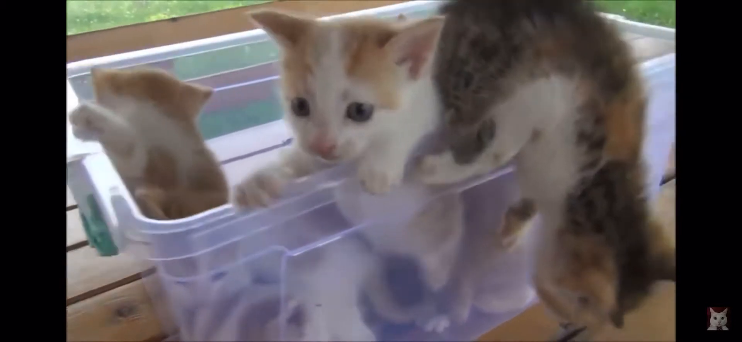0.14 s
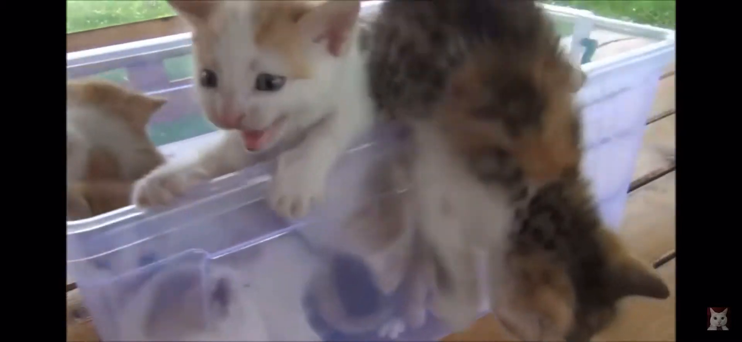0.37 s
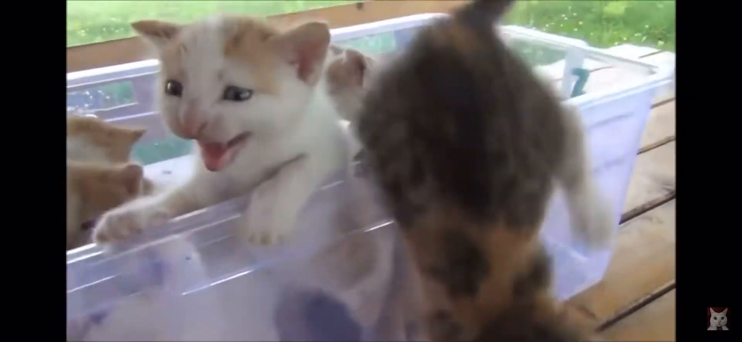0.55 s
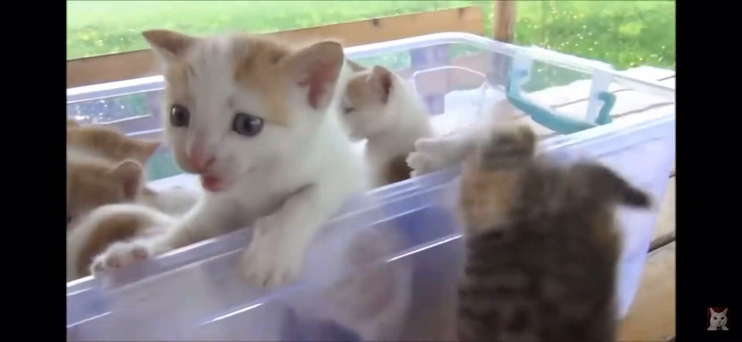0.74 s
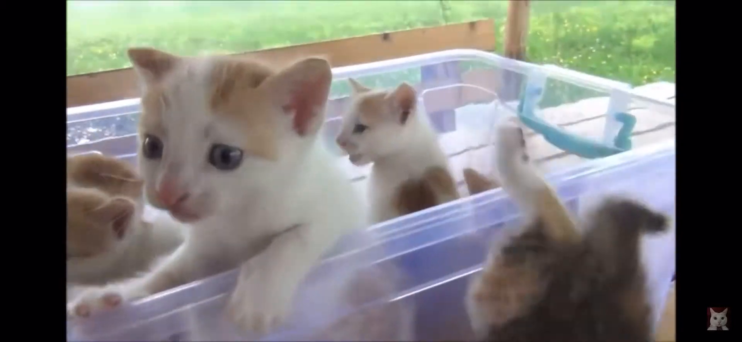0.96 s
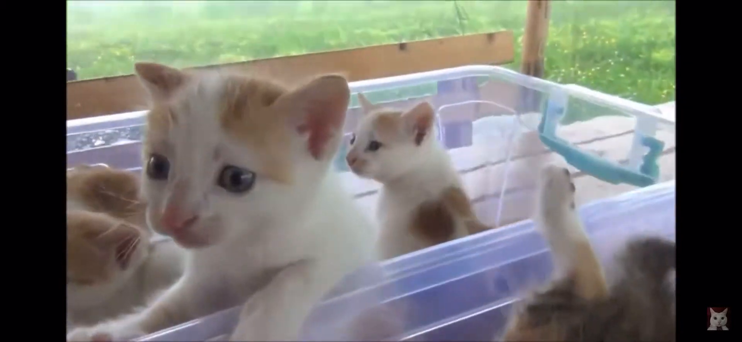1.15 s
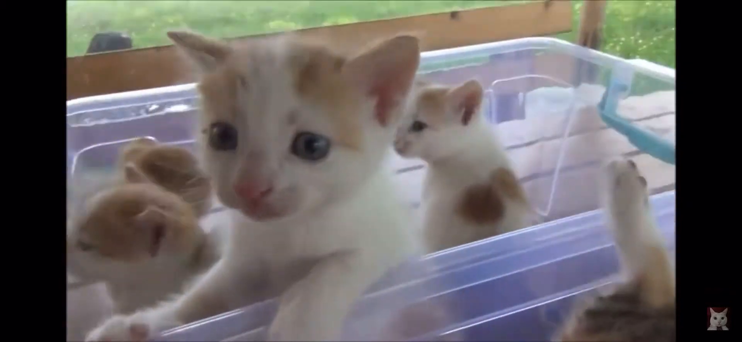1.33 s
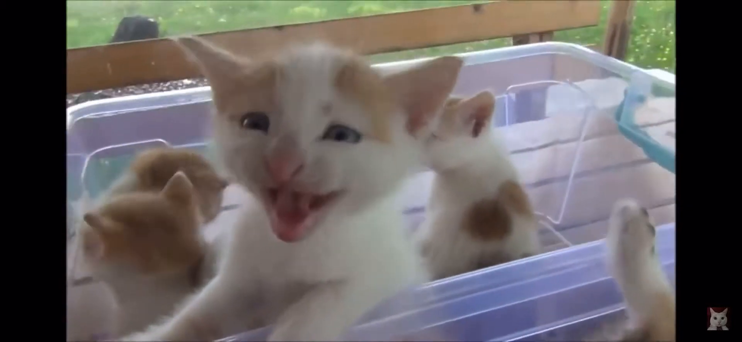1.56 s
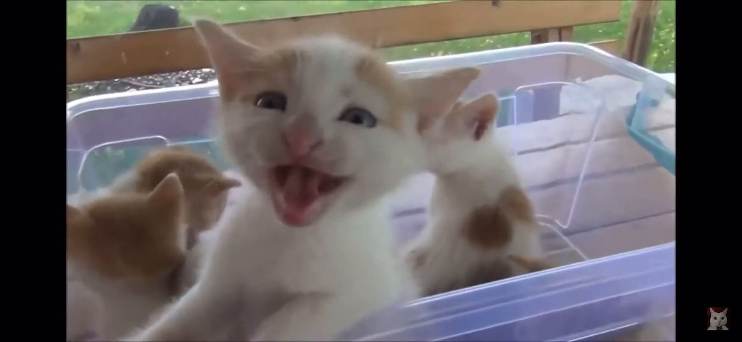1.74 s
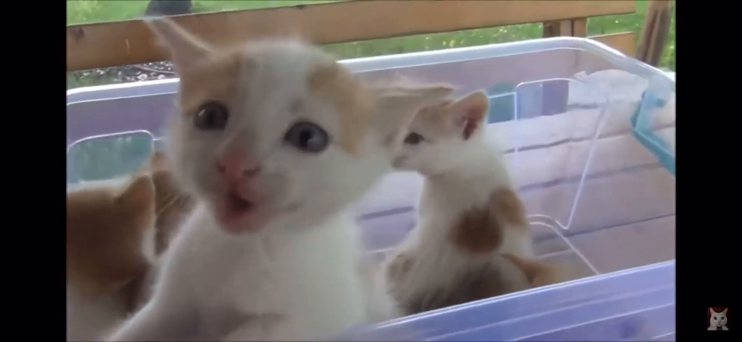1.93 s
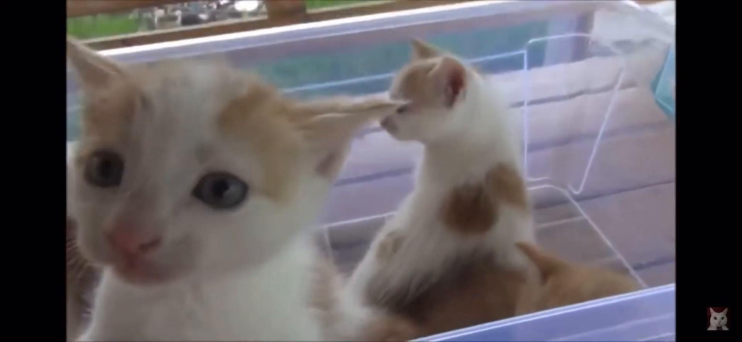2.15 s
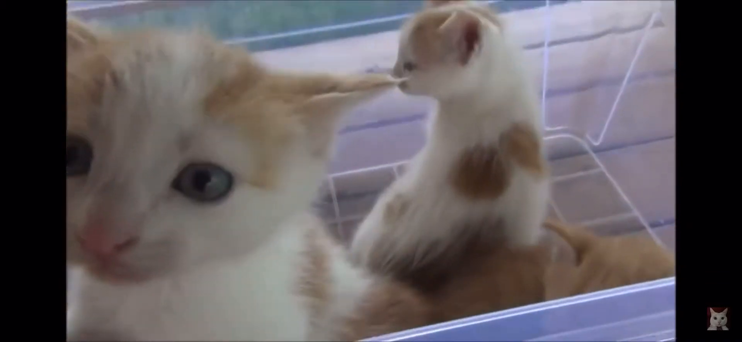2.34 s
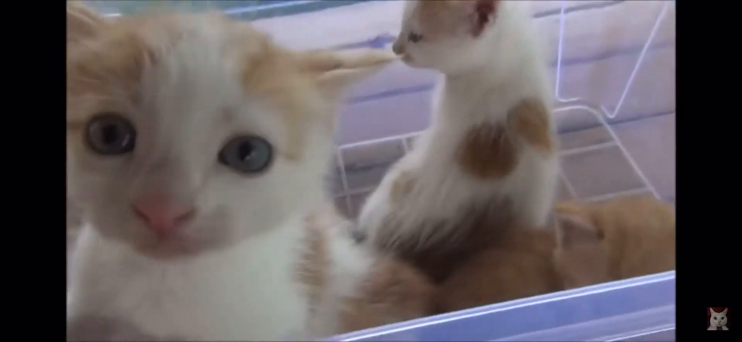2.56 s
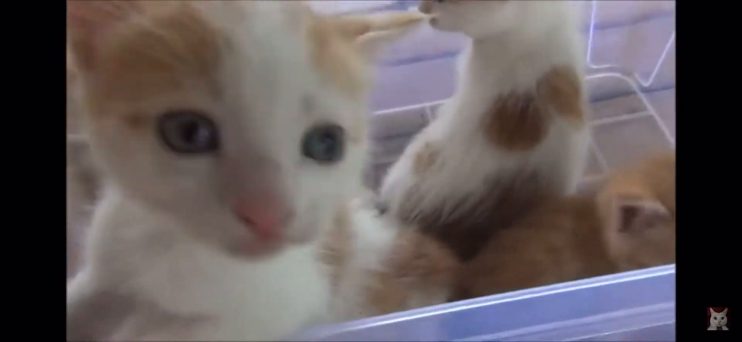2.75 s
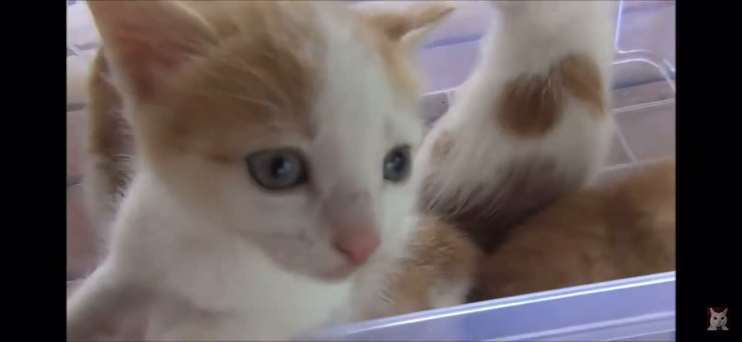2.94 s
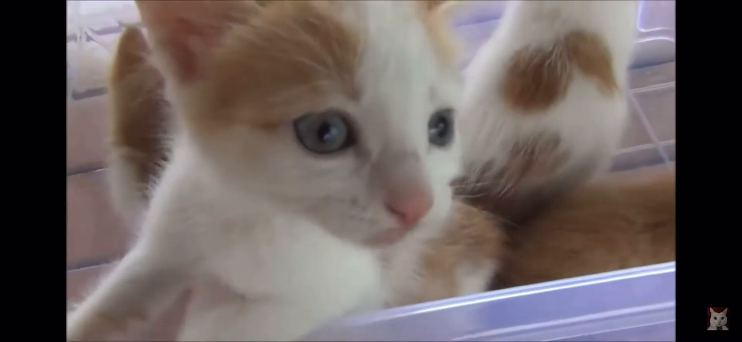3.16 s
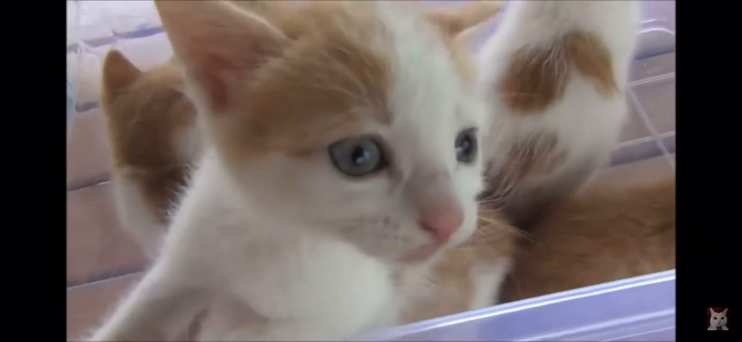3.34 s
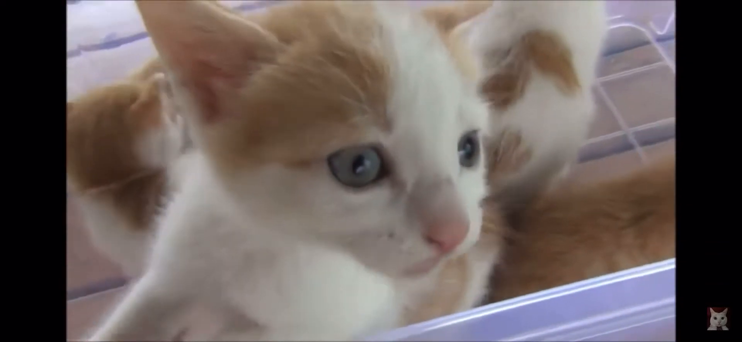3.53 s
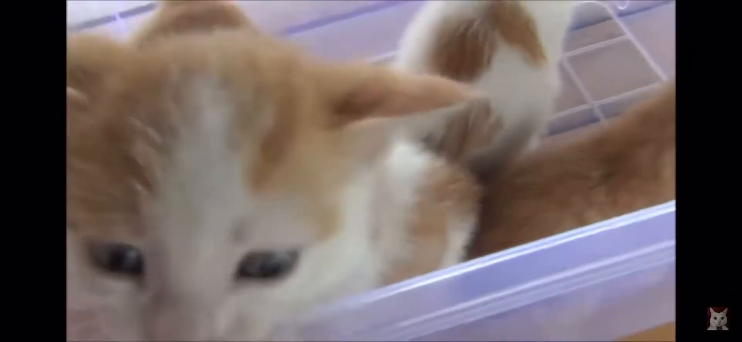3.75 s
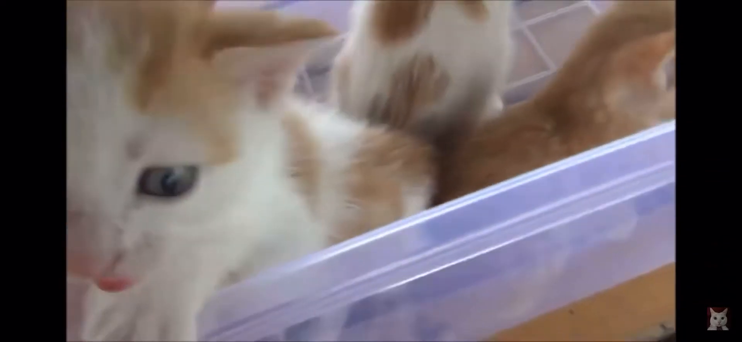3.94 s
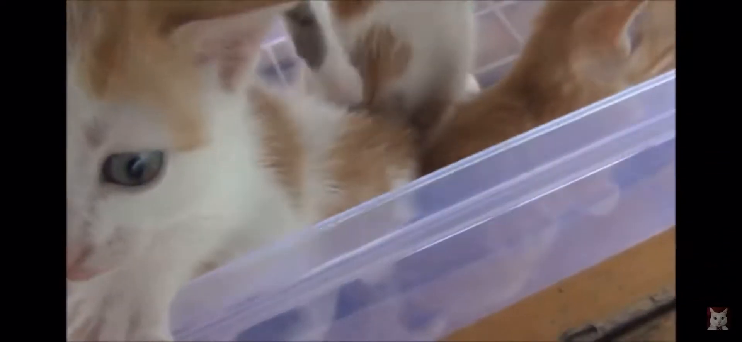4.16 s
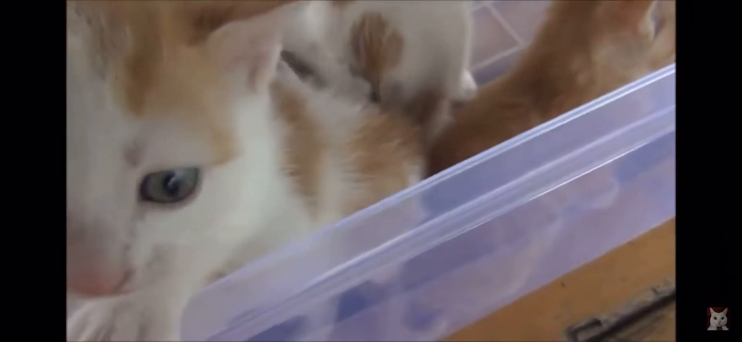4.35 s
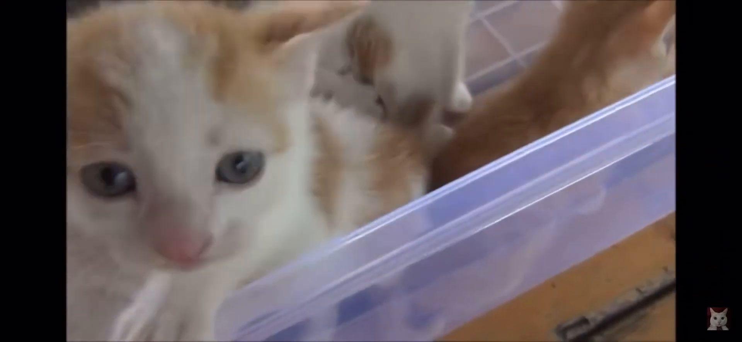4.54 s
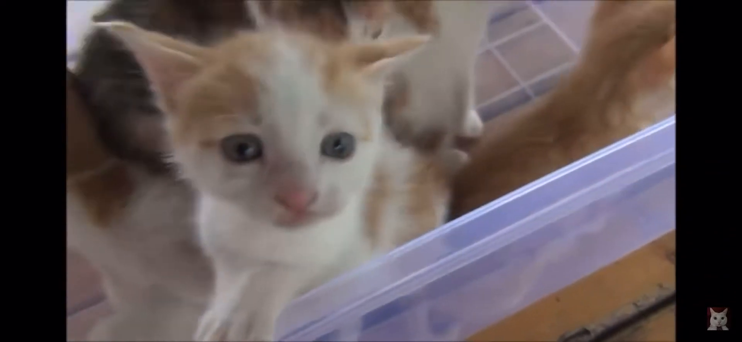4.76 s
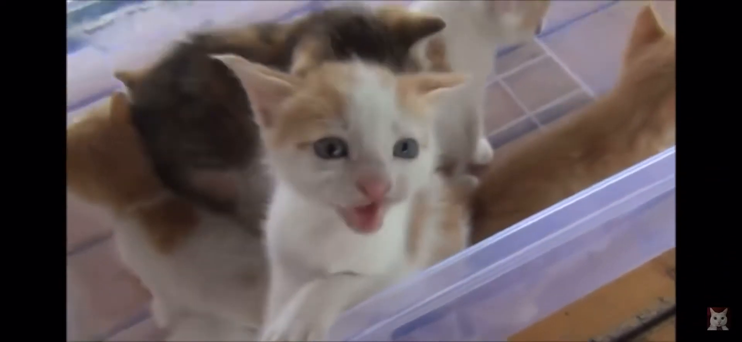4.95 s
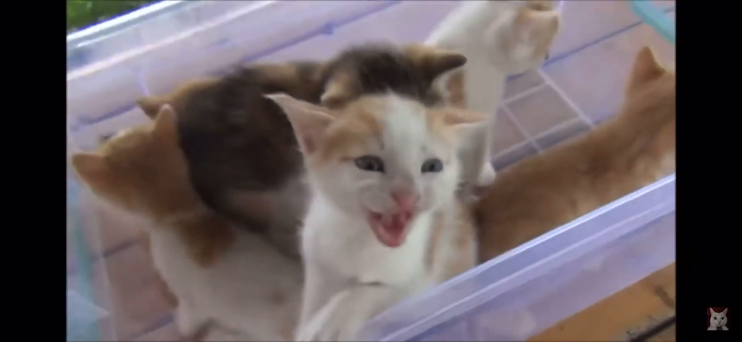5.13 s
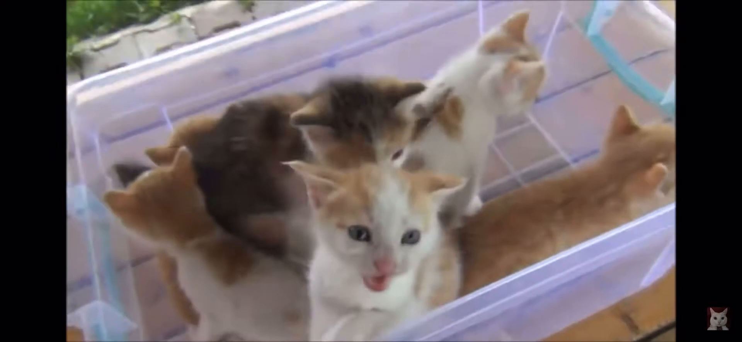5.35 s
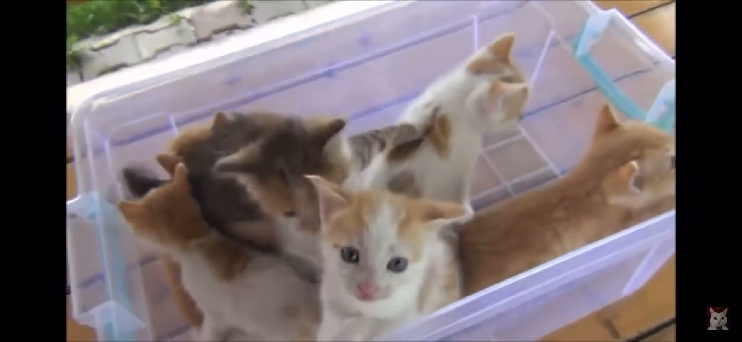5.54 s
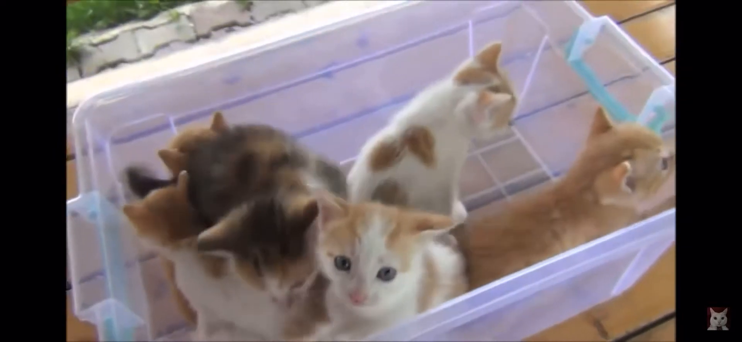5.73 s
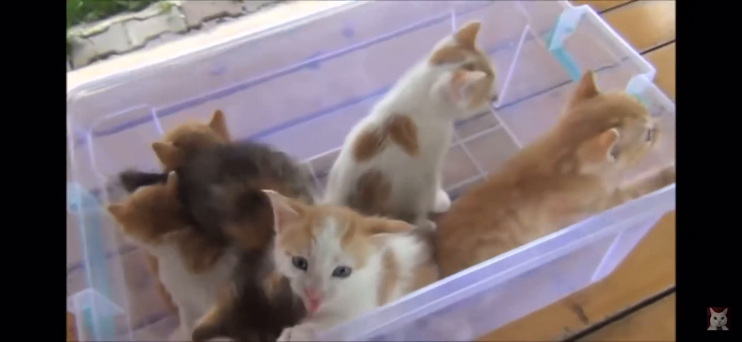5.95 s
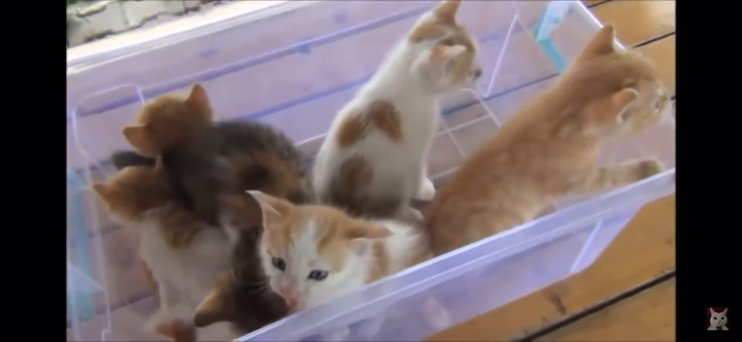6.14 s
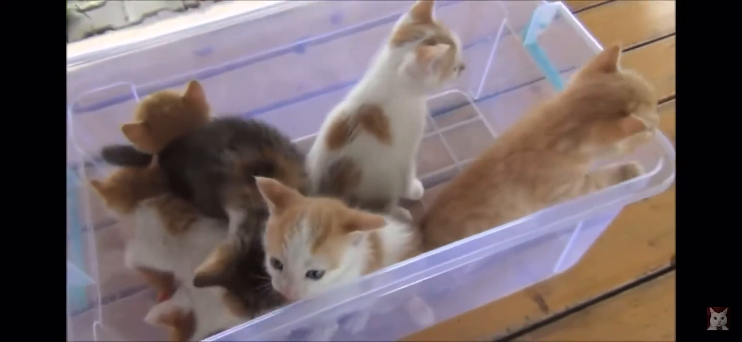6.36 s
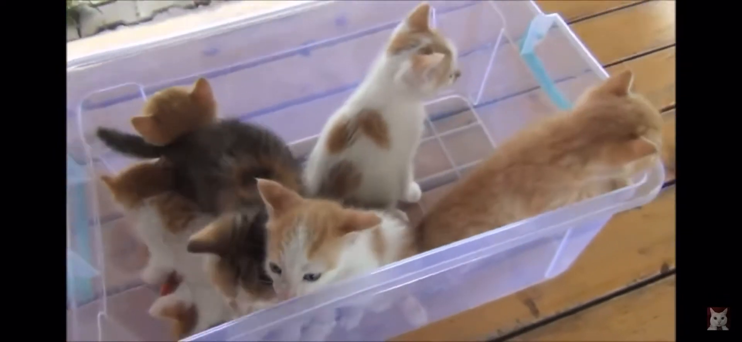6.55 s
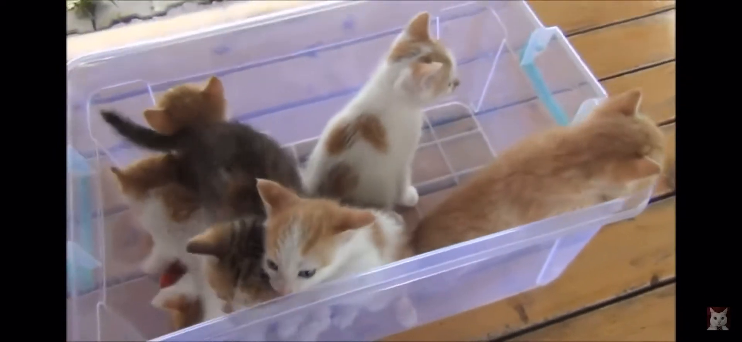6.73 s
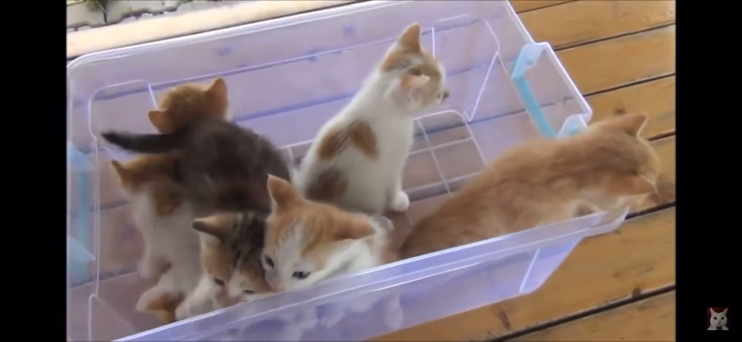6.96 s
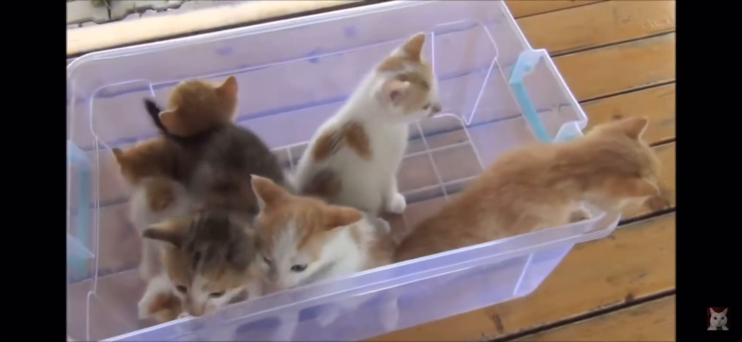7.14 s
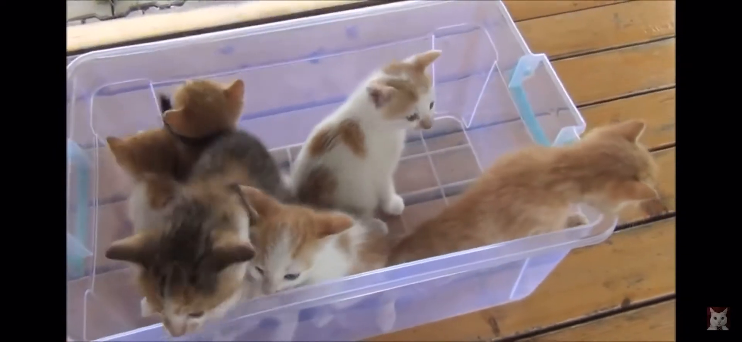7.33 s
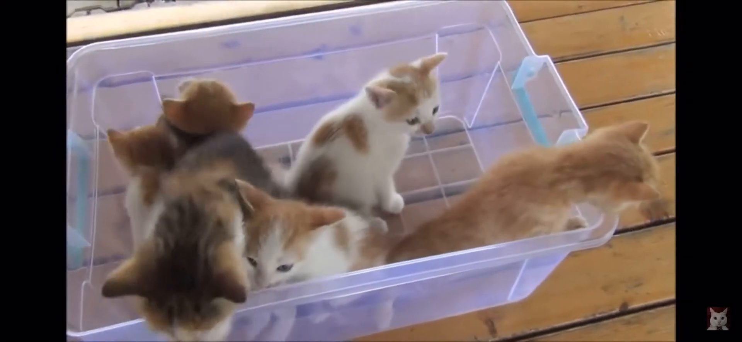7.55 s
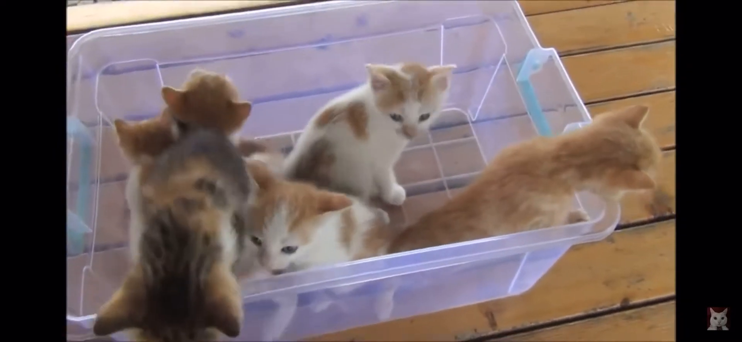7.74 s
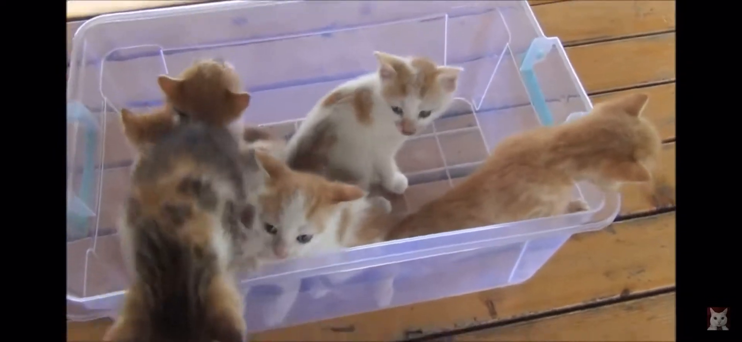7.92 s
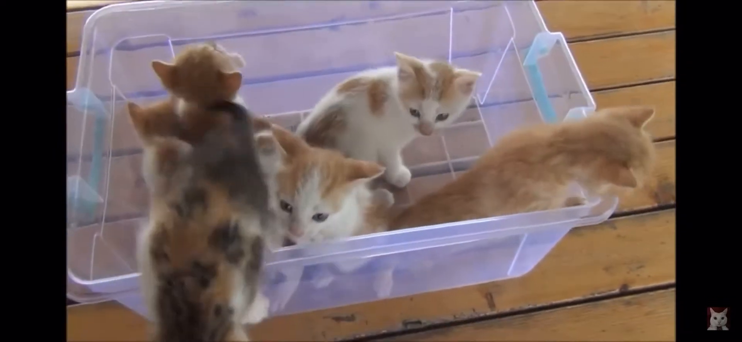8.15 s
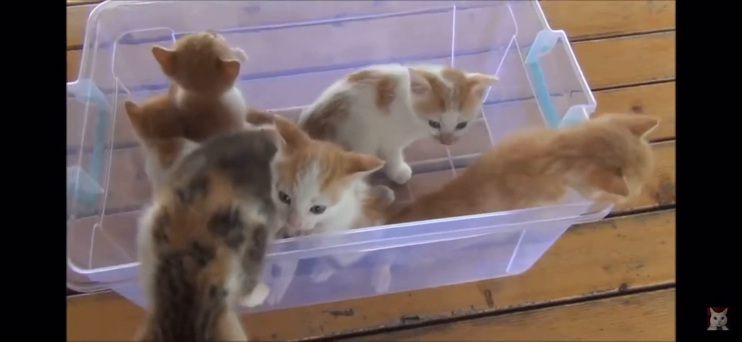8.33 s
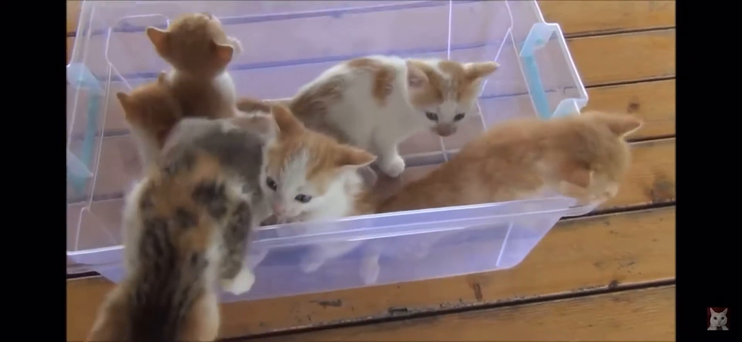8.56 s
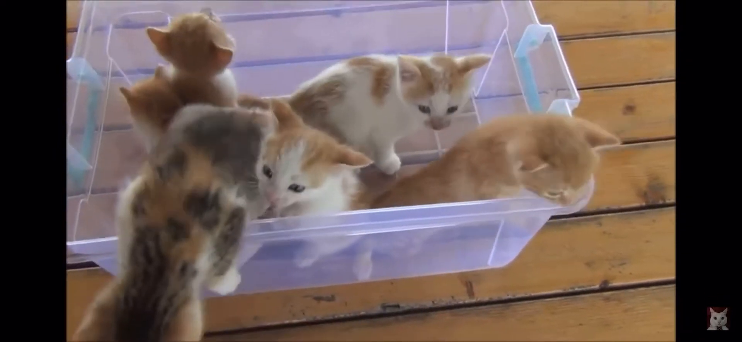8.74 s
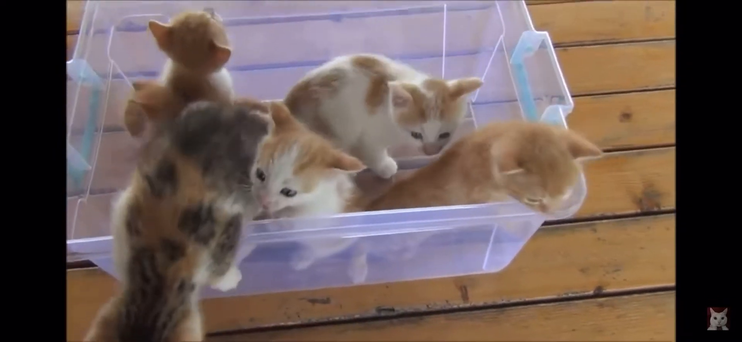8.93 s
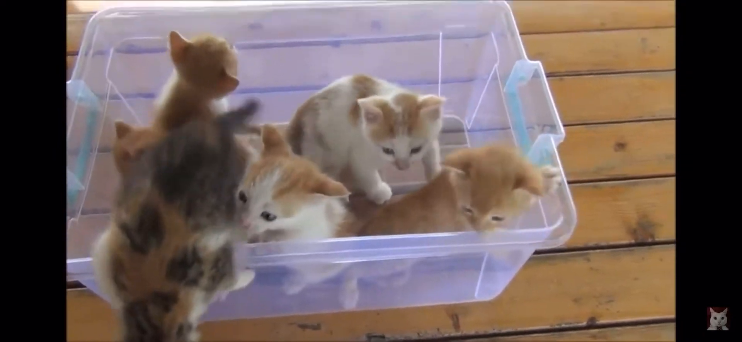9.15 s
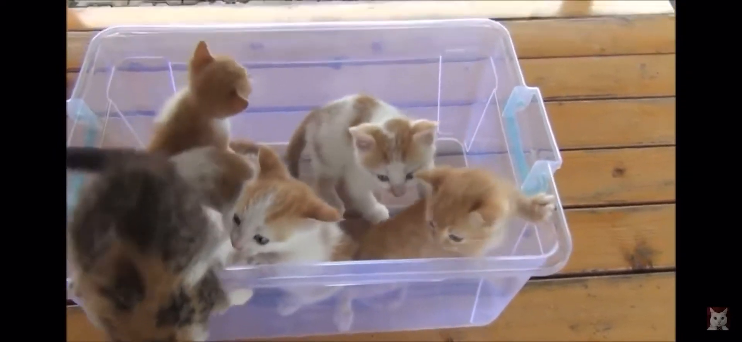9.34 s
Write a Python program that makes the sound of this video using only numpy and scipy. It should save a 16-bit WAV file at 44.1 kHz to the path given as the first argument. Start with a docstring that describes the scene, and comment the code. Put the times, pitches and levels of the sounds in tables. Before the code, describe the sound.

A near kitten gives bright, falling mews among thinner squeaks and muffled calls, while small paws bump and scratch a hollow plastic tub outdoors.

```python
"""Kittens crowd a plastic tub on a wooden porch and mew over one another, one voice nearest.
Each mew is a sum of harmonics filtered by mouth and head resonances, with leaking air roughening them.
Paws thump the tub, claws tick, scrape and rustle: noise bursts exciting damped resonances of tub and boards.
Shuffling bodies, outdoor air, a faint hum and a far bird's gliding whistles lie under it all."""
import sys
import numpy as np
from scipy import signal
from scipy.io import wavfile
from scipy.ndimage import uniform_filter1d

SR = 44100
rng = np.random.default_rng(int(sys.argv[2]) if len(sys.argv) > 2 else 0)


def level_to_linear(level):
    """Convert decibel levels to linear amplitude factors, elementwise."""
    exponent = np.asarray(level, float) / 20
    return 10 ** exponent


def dump_mix(stems):
    """Bounce the given channels to the path in sys.argv[1] as a 16-bit WAV at rate SR."""
    frames = np.atleast_2d(stems).T  # one column per channel
    limited = np.clip(frames, -1, 1)  # hard clip at full scale
    pcm = np.round(limited * 32767).astype(np.int16)
    wavfile.write(sys.argv[1], SR, pcm)


N = 414098  # length in samples

# the nearest kitten, one list a mew: start_s, pitch_hz, effort_db (relative), opening (mouth, 0-1)
NEAR_MEWS = [
    [(.292, 595, -51.5, 0.7), (.37, 943.6, -43, 0.67), (.42, 1004, -36.5, 0.67), (.465, 1002, -39, 0.6),
     (.5, 947, -34, .525), (.522, 943, -32, .52), (.536, 966, -39.5, .53), (.58, 921, -34.5, 0.45),
     (.63, 871, -40.5, 0.34), (.72, 743, -43, 0.26), (.812, 429, -52.5, 0.18)],
    [(1.428, 632, -54.5, 0.56), (1.48, 951, -43.5, 0.85), (1.54, 1041, -37, 0.68),
     (1.608, 988, -35.5, 0.58), (1.62, 1019, -38, 0.61), (1.72, 932, -38, 0.34), (1.82, 852, -39, 0.23),
     (1.95, 677, -43.5, 0.15), (1.998, 523, -44.5, 0.1)],
    [(3.575, 630, -52.5, 0.59), (3.63, 896, -42.5, 0.64), (3.695, 1021, -33, 0.64),
     (3.713, 994, -34.5, .57), (3.742, 991, -33.5, .56), (3.758, 999, -34, .51), (3.81, 975, -32.5, 0.41),
     (3.925, 892, -35.5, 0.24), (4.0, 835.7, -36.5, 0.23), (4.14, 614.5, -43.5, 0.14),
     (4.182, 470, -41.5, 0.04)],
    [(4.965, 607, -59, 0.61), (5.03, 909, -46, 0.73), (5.1, 1021, -39, 0.65), (5.137, 1012, -37, .6),
     (5.168, 967, -35, .545), (5.192, 989, -39, .49), (5.3, 890.5, -41.5, 0.36), (5.4, 768, -43, 0.23),
     (5.538, 456.6, -53.5, 0.08)],
    [(5.858, 548, -62, 0.6), (5.91, 908, -44.5, 0.63), (5.97, 1008, -40, 0.66), (6.08, 969, -39, 0.53),
     (6.2, 886.5, -40, 0.38), (6.3, 812, -47, 0.26), (6.4, 658, -47.5, 0.19), (6.512, 447, -68.5, 0.22)],
    [(8.56, 577.4, -57, 0.54), (8.61, 835, -53, 0.75), (8.66, 922, -42.5, 0.61), (8.72, 951, -42.5, 0.6),
     (8.78, 900.4, -38.5, 0.5), (8.86, 877, -38.5, 0.4), (8.92, 797, -43, 0.29), (9.03, 669, -46, 0.21),
     (9.158, 446.6, -55.5, 0.07)],
]
# side of each near mew: left_minus_right_db
NEAR_SIDES = [1.33, 0.63, 3, 0.37, 0.34, 1.1]


def read(points, hz):
    """Interpolates a spectrum linearly in dB along a log-frequency axis."""
    f, value = np.transpose(points)
    return np.interp(np.log(hz + 1), np.log(f + 1), value)


def evened(x):
    """Normalizes the mean power: scales to rms 1."""
    return x / np.sqrt(np.mean(x ** 2) + 1e-20)


def add(mix, s, sound, pan_db=0):
    """Superposes a sound at a time in seconds, placed by its left-minus-right level difference."""
    part = mix[:, round(s * SR):][:, :len(sound)]
    part += sound[:part.shape[1]] * level_to_linear(np.array([[pan_db / 2], [-pan_db / 2]]))


def drift(length, size):
    """Low-pass random fluctuation of rms 1: white noise averaged twice over size samples."""
    return evened(uniform_filter1d(uniform_filter1d(rng.standard_normal(length), size), size))


def resonate(x, hz, width_hz):
    """Resonance of gain 1 by heterodyning: shifts hz to zero, smooths with one pole, shifts back."""
    turn = np.exp(2j * np.pi * np.cumsum(hz * np.ones(len(x))) / SR)
    r = np.exp(-np.pi * width_hz / SR)
    return 2 * (turn * signal.lfilter([1 - r], [1, -r], x / turn)).real


def resonate_twice(x, hz, width_hz):
    """Two equal resonances in cascade, which steepen the skirts."""
    return resonate(resonate(x, hz, width_hz), hz, width_hz)


def rounded(t, s, v):
    """Monotone cubic curve through the points, smooth and without overshoot."""
    step = np.diff(v) / np.diff(s)
    a, b = np.r_[step[0], step], np.r_[step, step[-1]]
    slope = np.where(a * b > 0, 2 * a * b / (a + b + 1e-20), 0)  # harmonic mean of both sides
    i = np.clip(np.searchsorted(s, t) - 1, 0, len(step) - 1)
    h = np.diff(s)[i]
    u = (t - s[i]) / h
    bend = (1 - u) * (slope[i] - step[i]) - u * (slope[i + 1] - step[i])
    return v[i] + h * u * (step[i] + (1 - u) * bend)


def mew(rows, head, sharp=0.82, tilt_db=0, dark_db=-18, jitter=.0025, shimmer_db=1.5, breath_db=-29.0,
        top_db=0, rasp_db=6.0, rise_s=0.005):
    """Source and filter: fold harmonics under a mouth resonance that follows the opening, roughened by air."""
    # gain round the mouth resonance: ratio (to the resonance), shape_db (before the factor sharp)
    mouth_shape = [(.2, 5.5), (.35, -2.1), (.5, 10), (.7, 10), (.86, 19.5), (.97, 30.5), (1.03, 27.5),
                   (1.15, 19.5), (1.35, 9.5), (1.6, 5.5), (2.1, 2), (5, 1.7)]
    shut_hz, open_hz, head_from_hz, top_hz = 1000, 4500, 3300, 15800
    s, *values = np.transpose(rows)
    t = np.arange(s[0], s[-1], 1 / SR)
    slow = t[::32]  # control rate
    hz, effort_db, opening = (rounded(slow, s, v) for v in values)

    pitch = np.interp(t, slow, hz * (1 + .003 * drift(len(slow), size=28)))
    phase = 2 * np.pi * np.cumsum(pitch * (1 + jitter * drift(len(t), size=150))) / SR
    # leaking air comes in bursts and is strongest at the start
    bursts_db = np.interp(t, slow, rasp_db * np.clip(drift(len(slow), size=12), -2, 2))
    onset_db = 19.0 * np.exp((t[0] - t) / .05)
    leak = level_to_linear(breath_db + bursts_db + onset_db) * drift(len(t), size=8)

    # head resonances sit lower wherever the pitch is below its top
    head_shift = (hz.max() / hz) ** .35
    mouth_hz = shut_hz + (open_hz - shut_hz) * np.clip(opening, -.2, 1)
    # a wide mouth leaves a gap under its resonance; a narrow one muffles what lies above
    gap_db = -21.5 * np.clip((opening - .58) / 0.064, 0, 1)
    dark_db = dark_db * np.clip((0.61 - opening) / 0.75, 0, 1)

    voice = np.zeros(len(t))
    for k in range(1, int(min(head[-1][0], top_hz) / hz.min())):
        partial_hz = k * hz
        head_hz = partial_hz * head_shift
        at = partial_hz / mouth_hz
        db = effort_db + tilt_db * np.log2(k) + sharp * read(mouth_shape, at)
        db += gap_db * np.exp(-((at - 0.81) / 0.15) ** 2)
        db += dark_db * np.clip((at - 1.383) / 0.17, 0, 1) * np.clip((11340 - partial_hz) / 4000, .3, 1)
        # the level of high partials flickers most
        db += np.minimum(shimmer_db * np.clip(k - 2.6, .3, 5.5), 5) * drift(len(slow), size=30)
        db += read(head, np.maximum(head_hz, head_from_hz)) - read(head, head_from_hz)
        # a wide mouth fills the dip of the head
        db += 7.6 * np.clip(opening / .6, 0, 1) ** 2 * np.exp(-((head_hz - 8600) / 1500) ** 2)
        db += top_db * np.clip((partial_hz - 9000) / 4000, 0, 1)
        level = np.interp(t, slow, level_to_linear(db) * (partial_hz < top_hz))
        roughness = 1 + np.minimum(k * pitch / 4000, 2) ** 2 * leak
        voice += level * roughness * np.sqrt(2) * np.sin(k * phase + k * k)
    edge = np.clip(np.minimum((t - t[0]) / rise_s, (t[-1] - t) / 0.012), 0, 1)  # fast start, softer stop
    return t[0], voice * edge


def kittens():
    """Five voices of one source-filter model, differing in spectral tilt, resonance and irregularity."""
    # other voices, one list a call: start_s, pitch_hz, effort_db (relative), opening (mouth, 0-1)
    thin_mews = [
        [(0.0, 1106, -50.5, 0.18), (.12, 910, -65, 0.18)],
        [(4.715, 1035, -49, 1), (4.76, 1250, -45.5, 0.7), (4.81, 1368, -44, 0.6), (4.9, 1304, -43.5, 0.36),
         (5.02, 1156, -54, 0.06), (5.08, 1070, -48, 0.05)],
        [(5.455, 986, -42, 0.4), (5.58, 1165, -46.5, 0.59), (5.66, 1114, -44.5, 0.16), (5.79, 1003, -48, 0.13),
         (5.84, 750, -49, 0.03)],
        [(6.21, 980, -57, 0.9), (6.28, 1196, -40.5, 0.57), (6.37, 1244, -42.5, 0.77), (6.6, 1199, -45.5, 0.05),
         (6.745, 1095, -47, 0.08)],
        [(7.685, 1066, -50, 0), (7.75, 1266, -48, 0.62), (7.85, 1328, -41, 0.5), (8.0, 1269, -38.5, 0.06),
         (8.145, 1093, -47.5, 0.07)],
    ]
    squeaks = [
        [(0.0, 1630, -54, 0.72), (.1, 1588, -60, 0.66), (.245, 1374, -59.5, 0.6)],
        [(1.372, 1540, -53, 0.69), (1.44, 1542, -46, 0.76), (1.57, 1620, -56.5, 0.6), (1.64, 1543, -70, 0.5)],
        [(3.094, 1660, -52, 0.64), (3.128, 1570, -57.5, 0.6), (3.155, 1520, -82, 0.63)],
        [(7.11, 1390, -70, 0.55), (7.128, 1540, -60, 0.58), (7.132, 1690, -48, 0.57), (7.15, 1620, -49, 0.5),
         (7.179, 1590, -51, 0.57), (7.186, 1460, -56, 0.64), (7.195, 1520, -62, 0.57), (7.199, 1614, -53, 0.54),
         (7.21, 1520, -49.5, 0.51), (7.218, 1464, -50, 0.7)],
        [(7.892, 1683, -51.5, 0.73), (8.05, 1627, -54.5, 0.62), (8.07, 1570, -60, 0.6),
         (8.18, 1630, -63.5, 0.76)],
        [(9.232, 1505, -52, 0.62), (9.25, 1684, -43, 0.74), (9.29, 1690, -43, 0.76), (9.35, 1712, -48, 0.64),
         (9.41, 1715, -44.5, 0.7)],
    ]  # the highest voice
    hoarse_calls = [
        [(1.612, 497, -43, 0), (1.72, 510.2, -52.5, 1), (1.77, 492, -72.5, 0.4), (1.89, 440.2, -53, 0.2),
         (1.98, 404, -54.5, 0.17), (2.17, 473, -51.5, .0), (2.28, 325, -54, 0.01)],
    ]
    low_calls = [
        [(.845, 486.7, -53, 0.2), (.97, 555, -63, 0.24), (1.18, 525.5, -58, 0.1), (1.55, 559, -56.5, 0.09)],
        [(1.76, 930, -43.5, 0.34), (1.9, 925, -44, 0.31), (1.97, 735, -45, 0), (2.05, 866, -46, 0.04),
         (2.2, 958, -69, 0.08)],
        [(3.382, 502.6, -50, 0), (3.46, 663, -46, 0.36), (3.5, 703.5, -47.5, 0.27), (3.6, 750, -39.5, 0.29),
         (3.75, 677, -45, 0.17), (3.88, 690, -43, 0.18), (3.905, 812, -76, 0.8)],
    ]  # muffled, from inside the heap
    # side of each call: left_minus_right_db
    thin_sides = [-6, -4.5, -2.5, -3, -2.5]
    low_sides = [1, 0.53, 3.5]
    # colour of the head on upper partials, relative to 3300 Hz: freq_hz, level_db
    head_colour = [(3300, 0), (4050, 1.5), (5000, -2), (6500, 0), (8600, -17), (11000, -6.5),
                   (13300, -12.5), (16500, -39.5)]
    # the same for the low voices, with two narrow head resonances: freq_hz, level_db
    low_head = [(4100, -7.5), (5700, -5), (7000, -15), (8500, -5.5), (11800, -25)]
    # brightness of each near mew as the head turns: tilt_db_per_octave
    near_tilts = [-0.19, 1, 0.8, 0.071, -0.24, -2.1]
    # lift of each near mew, growing from 9 kHz to its full value at 13 kHz: lift_db
    near_tops = [4, 9, -0.5, 7.5, 4, 5]
    mix = np.zeros((2, N))
    for rows, pan_db, tilt_db, top_db in zip(NEAR_MEWS, NEAR_SIDES, near_tilts, near_tops):
        add(mix, *mew(rows, head_colour, tilt_db=tilt_db, top_db=top_db), pan_db)
    thin = dict(head=head_colour, sharp=0.4, tilt_db=-4.5, dark_db=-14.5, breath_db=-28.5,
                shimmer_db=4.0, top_db=5.5)
    squeaky = dict(head=head_colour, sharp=0.98, tilt_db=-2.5, jitter=0.01, breath_db=-31.5,
                   shimmer_db=1.0, rise_s=0.0011)
    hoarse = dict(head=low_head, sharp=0.51, tilt_db=-2.0, jitter=0.044, breath_db=-21.0)
    low = dict(head=low_head, sharp=0.59, tilt_db=-3.0, jitter=0.015, breath_db=-16.5, shimmer_db=10.5)
    for calls, sides, voice in ((thin_mews, thin_sides, thin),
                                (squeaks, [1.1] * len(squeaks), squeaky),
                                (hoarse_calls, [1.2], hoarse),
                                (low_calls, low_sides, low)):
        for rows, pan_db in zip(calls, sides):
            add(mix, *mew(rows, **voice), pan_db)
    return mix


def puffs():
    """Turbulent flow: air escaping as the folds let go excites mouth and head after each near mew."""
    # resonances of the escaping air: freq_hz, width_hz, level_db (relative)
    puff_bands = [(1390, 2600, 3.5), (3430, 830, -10), (9550, 1600, -13.5)]
    # one puff a near mew: level_db (relative)
    puff_levels = [-36, -33.5, -38.5, -40.5, -42, -39]
    early_s, length_s = 0.016, 0.041  # starts just before the mew ends
    mix, count = np.zeros((2, N)), round(length_s * SR)
    for rows, pan_db, level_db in zip(NEAR_MEWS, NEAR_SIDES, puff_levels):
        flow = rng.standard_normal(count) * level_to_linear(2.5 * drift(count, size=60))
        rasp = sum(level_to_linear(db) * evened(resonate_twice(flow, hz, width_hz)) for hz, width_hz, db in puff_bands)
        rasp = rasp * signal.windows.tukey(count, .9)
        add(mix, rows[-1][0] - early_s, level_to_linear(level_db) * rasp, pan_db)
    return mix


def thumps():
    """Forced vibration: a soft push shakes the plastic into a dull ring and a weaker clack."""
    # paws bumping the tub: start_s, peak_db, ring_hz
    paw_bumps = [(0.051, -35.5, 121), (0.636, -24, 361.4), (0.69, -20.5, 174), (0.917, -34, 189.5),
                 (1.686, -28, 404), (1.867, -31, 370), (2.424, -37, 345), (2.967, -29, 276.5),
                 (5.635, -36, 124.6), (5.746, -33.5, 297), (6.013, -23, 260), (6.979, -29.5, 289),
                 (7.237, -31.5, 227), (8.917, -25.5, 130.4), (9.155, -31, 295), (9.357, -26.5, 246.6)]
    mix, t = np.zeros((2, N)), np.arange(SR // 6) / SR
    for s, db, hz in paw_bumps:
        push = rng.standard_normal(len(t)) * np.minimum(t / 0.0028, 1) * level_to_linear(-60 * t / 0.13)
        ring = resonate_twice(push, hz, 170) + level_to_linear(-32.0) * resonate(push, 540, 1100)
        boards = resonate(resonate_twice(push, 118, 120), 118, 120)
        ring += level_to_linear(db + 17.5) * boards  # hard bumps also shake the boards
        add(mix, s, level_to_linear(db) * ring / abs(ring).max(), .8 + 2 * rng.standard_normal())
    return mix


def ticks():
    """Impulsive excitation: a very short broadband snap over a duller knock."""
    # claws and wet mouths ticking: start_s, peak_db (of the bright part)
    tick_times = [(0.6393, -25.5), (0.842, -33), (2.3264, -40), (2.392, -37.5), (2.474, -39.5),
                  (2.554, -42.5), (2.61, -38.5), (2.729, -40), (2.663, -29), (2.78, -45.5), (3.225, -43),
                  (4.427, -40), (4.4525, -36.5), (6.7489, -33.5), (8.8854, -36.5), (9.157, -41.5),
                  (9.356, -24.5)]
    mix, t = np.zeros((2, N)), np.arange(SR // 20) / SR
    for s, db in tick_times:
        decay = level_to_linear(-60 * t / 0.015) + level_to_linear(-15.5 - 60 * t / 0.055)
        snap = rng.standard_normal(len(t)) * decay
        high, low = resonate(snap, 3300, 9600), resonate(snap, 910, 1200)
        tick = high / abs(high).max() + level_to_linear(3.5) * low / abs(low).max()
        add(mix, s, level_to_linear(db) * tick, .8)
    return mix


def scrapes():
    """Stick-slip friction: uneven slips excite a broad wall resonance, with a hiss of fur on plastic."""
    # claws dragged on the wall: start_s, length_s, level_db, wall_hz, hiss_db (levels before the fades)
    claw_drags = [(0.843, 0.046, -51, 1455, -45), (1.667, 0.088, -36, 1000, -37),
                  (1.699, 0.07, -31.5, 2240, -50), (2.018, 0.3, -41.5, 1060, -54),
                  (2.589, 0.16, -65, 2854, -45.5), (2.653, 0.045, -50, 2480, -36),
                  (4.919, 0.13, -42, 1190, -39), (7.217, 0.039, -40, 1083, -57)]
    mix = np.zeros((2, N))
    for s, length, level_db, hz, hiss_db in claw_drags:
        count = round(length * SR)
        slips = rng.standard_normal(count) * level_to_linear(3.2 * drift(count, size=160))
        wall = evened(resonate(resonate(slips, hz, 550), hz, 1000))
        hiss = evened(resonate(resonate(slips, 4800, 9000), 4300, 14000))
        scrape = level_to_linear(level_db) * wall + level_to_linear(hiss_db) * hiss
        add(mix, s, scrape * signal.windows.tukey(count, .6), 1.0)
    return mix


def rustle(per_s=110, spread_db=-0.5):
    """Random impact train: scattered small scratches, each in its own resonance of the wall."""
    # restless claws and fur: start_s, level_db (relative)
    rustle_curve = [(2.36, -43.5), (2.62, -35.5), (2.92, -43.5)]
    s, db = np.transpose(rustle_curve)
    length_s = s[-1] - s[0]
    mix, t = np.zeros((2, N)), np.arange(SR // 25) / SR
    for when, pitch, size, ring in rng.random((round(per_s * length_s), 4)):
        when, hz = s[0] + when * length_s, 1300 * 5 ** pitch ** 2
        burst = rng.standard_normal(len(t)) * np.minimum(t / 0.0018, 1) * level_to_linear(-60 * t / (.02 + .1 * ring))
        level = level_to_linear(np.interp(when, s, db) - spread_db * np.log(size + 0.0305))
        scratch = resonate_twice(burst, hz, .5 * hz) * np.sqrt(4000 / hz)  # offsets the wider band
        add(mix, when, level * scratch, .8)
    return mix


def shuffle(same=0.98):
    """Amplitude-modulated friction noise: lumpy low rubbing, mostly coherent between the sides."""
    # bodies shifting in the tub: start_s, level_db
    shuffle_curve = [(0, -52.5), (2.202, -51), (4.6, -77), (5.7, -47.5), (7.001, -60.5), (9.39, -55.5)]
    lumps = rng.standard_normal((3, N)) * level_to_linear(np.minimum(4.8 * drift(N, size=900), 13))
    lumps = same * lumps[0] + np.sqrt(1 - min(same, 1) ** 2) * lumps[1:]
    rub = []
    for x in lumps:
        body = resonate(resonate(x, 430, 770), 300, 2000)
        deep = resonate(resonate(x, 150, 110), 160, 150)
        rub.append(body + level_to_linear(-15.5) * deep)
    return evened(np.array(rub)) * level_to_linear(np.interp(np.arange(N) / SR, *np.transpose(shuffle_curve)))


def porch(x, t60=0.6):
    """Exponential reverberant decay: a short tail of sparse echoes from tub, boards and roof."""
    length = SR // 3
    taps = np.zeros((2, length))
    grid = np.arange(100, length - 20, 20)
    at = grid + rng.integers(0, 20, (2, len(grid)))
    np.put_along_axis(taps, at, rng.choice([-1., 1.], at.shape), 1)
    taps *= level_to_linear(-60 * np.arange(length) / SR / t60)
    return signal.oaconvolve(x, taps / np.linalg.norm(taps[0]), axes=1)[:, :N]


def air(same=.9, patchy_db=.7):
    """Partly coherent shaped noise: outdoor wash and microphone hiss in patches, and a wavering hum."""
    # spectrum of the wash: freq_hz, level_db (relative, per Hz)
    air_spectrum = [(20, -53), (98, -10.5), (384, -11), (616, -15.5), (3880, -26), (9450, -29),
                    (15600, -30.5)]
    # hum tones: freq_hz, level_db
    hum_tones = [(116, -61.5)]
    frames, hz = N // 256 + 5, np.fft.rfftfreq(1024, 1 / SR)
    a, b, c, d, patches = rng.standard_normal((frames, 513, 5)).T
    patches = evened(uniform_filter1d(uniform_filter1d(patches, size=10, axis=0), size=12, axis=1))
    same, left = np.clip(same, 0, 1), a + 1j * b
    right = same * left + np.sqrt(1 - same ** 2) * (c + 1j * d)
    z = np.array([left, right]) * level_to_linear(read(air_spectrum, hz)[:, None] + patchy_db * patches)
    wash = level_to_linear(-53) * evened(signal.istft(z, nperseg=1024, noverlap=768)[1][:, :N])
    waver = np.cumsum(1 + 0.022 * drift(N, size=3000)) / SR
    hum = sum(level_to_linear(db + 0.53 * drift(N, size=4000)) * np.sin(2 * np.pi * f * waver) for f, db in hum_tones)
    return wash + hum


def bird():
    """Frequency modulation: thin, slightly rough whistles whose pitch dips and flicks up."""
    # a far bird: start_s, pitch_hz (at the bottom of the dip)
    bird_chirps = [(7.28, 3560), (7.391, 3760), (7.491, 3750), (7.613, 4100), (7.735, 4100)]
    mix = np.zeros((2, N))
    for s, hz in bird_chirps:
        u = np.linspace(-.8, 1, round(.065 * SR))
        pitch = hz + 550 * u ** 2 + 70 * drift(len(u), size=90)
        level = level_to_linear(-57.5 + 3.9 * drift(len(u), size=150)) * np.hanning(len(u)) ** .5
        add(mix, s, level * np.sin(2 * np.pi * np.cumsum(pitch) / SR))
    return mix


def scene():
    """Superposition: calls and knocks share the porch echo; shuffling, air and bird are added without it."""
    tub = kittens() + puffs() + thumps() + ticks() + scrapes() + rustle()
    return tub + level_to_linear(-29) * porch(tub) + shuffle() + air() + bird()


def roll_off(x):
    """The treble ends steeply here."""
    return signal.sosfilt(signal.butter(12, 15760, fs=SR, output="sos"), x)


def record(dry):
    """High-pass response: the microphone drops the deepest bass, below 48 Hz."""
    cut = signal.lfilter(*signal.butter(2, 48, "high", fs=SR), dry)
    return roll_off(cut)


dry = scene()
out = record(dry)
dump_mix(out)
```